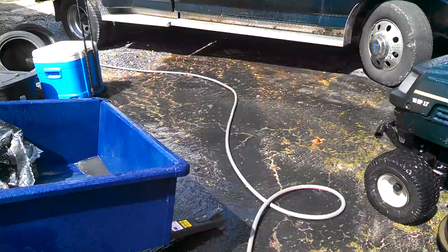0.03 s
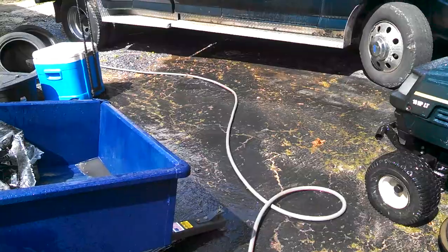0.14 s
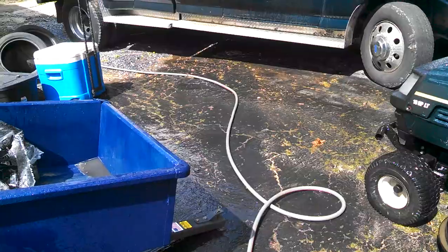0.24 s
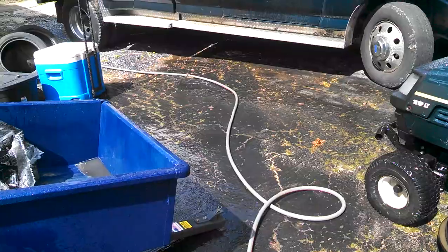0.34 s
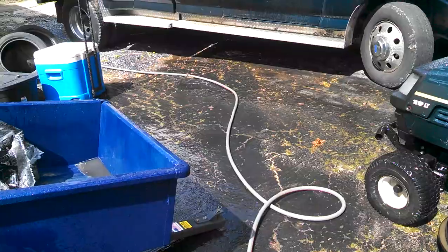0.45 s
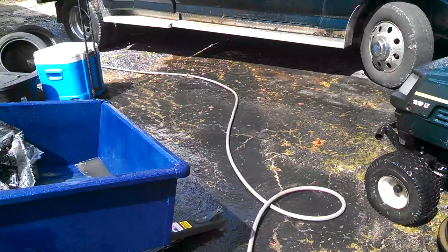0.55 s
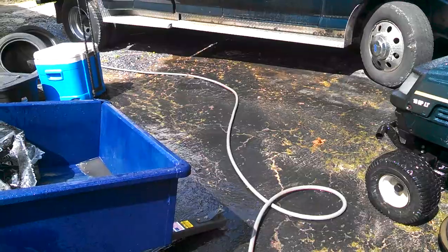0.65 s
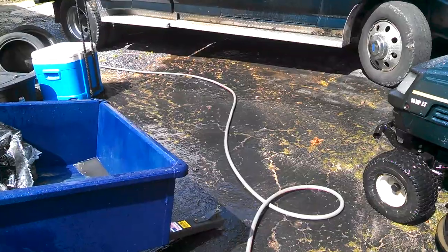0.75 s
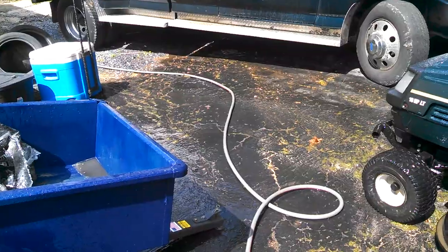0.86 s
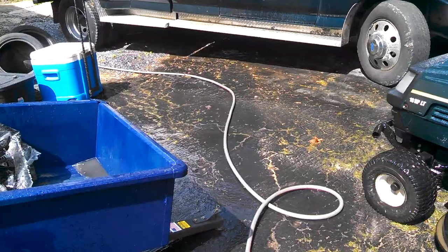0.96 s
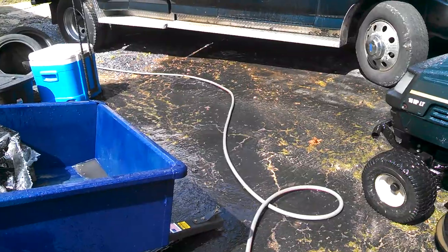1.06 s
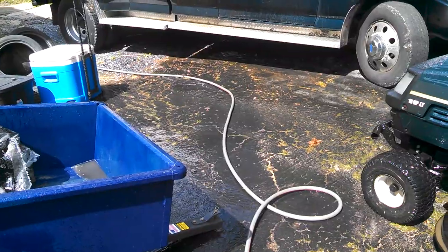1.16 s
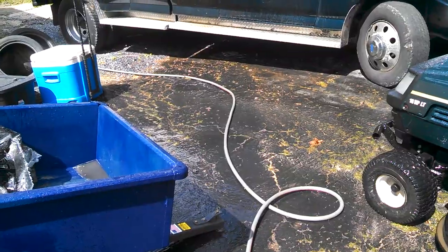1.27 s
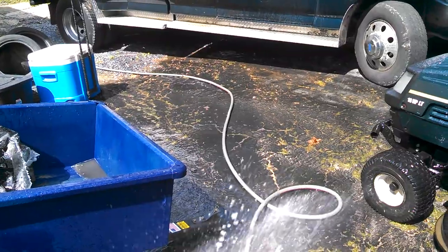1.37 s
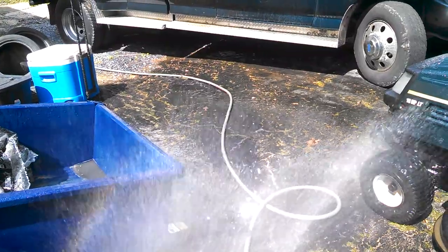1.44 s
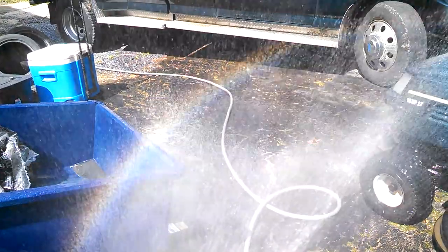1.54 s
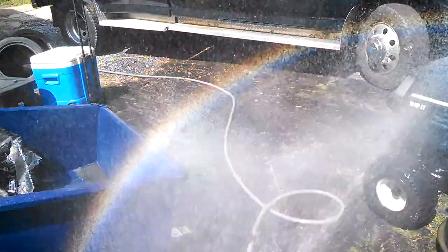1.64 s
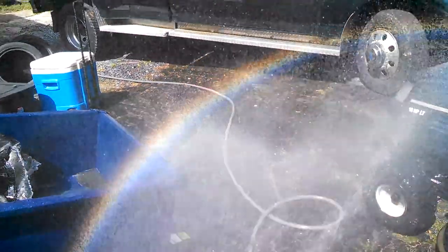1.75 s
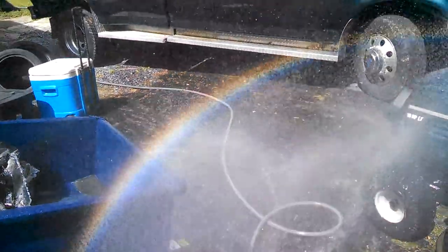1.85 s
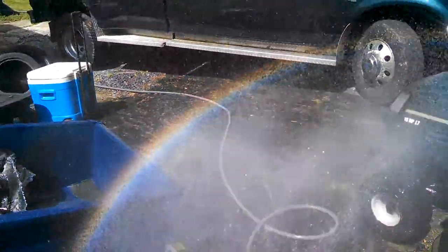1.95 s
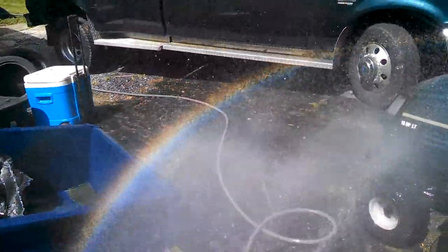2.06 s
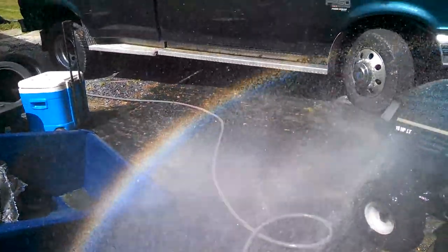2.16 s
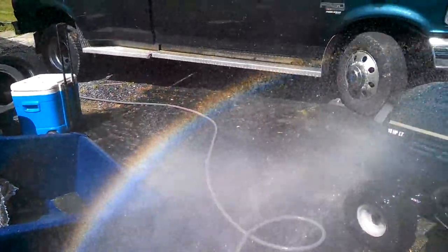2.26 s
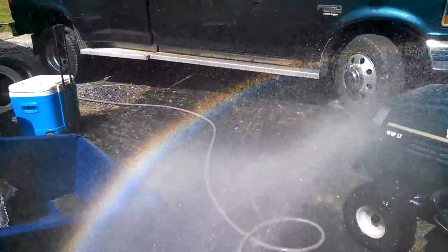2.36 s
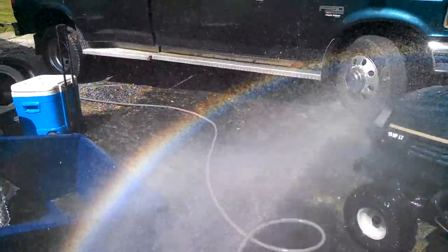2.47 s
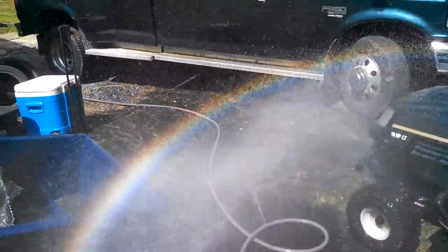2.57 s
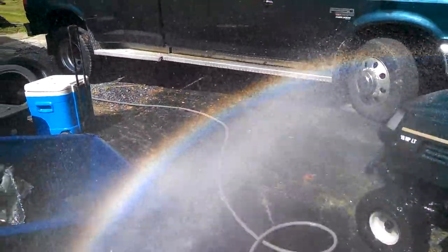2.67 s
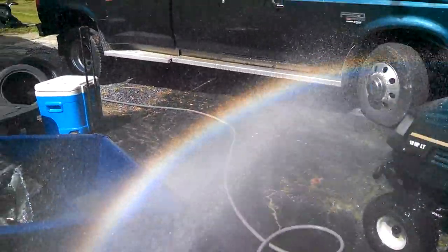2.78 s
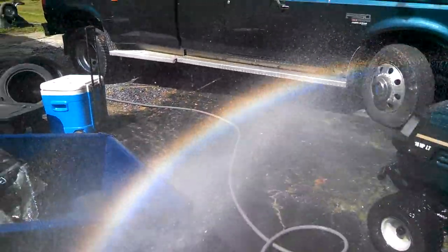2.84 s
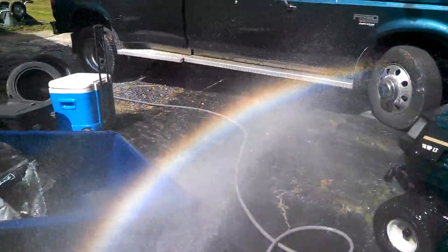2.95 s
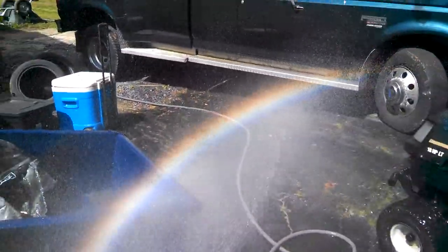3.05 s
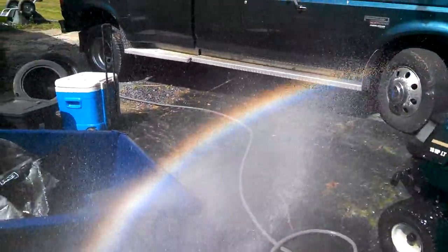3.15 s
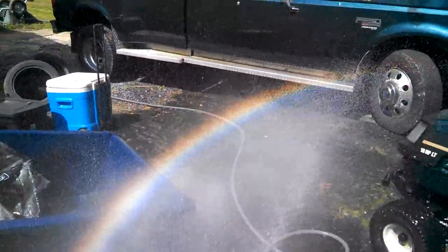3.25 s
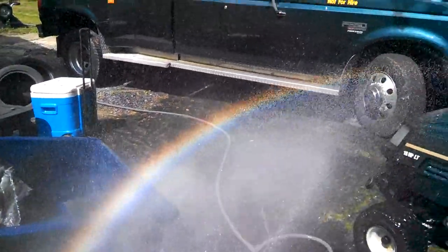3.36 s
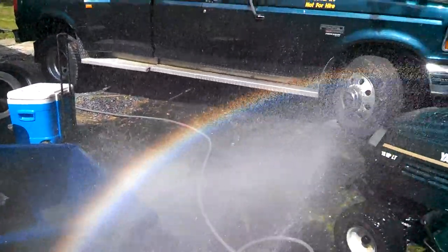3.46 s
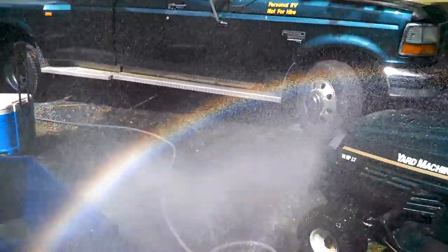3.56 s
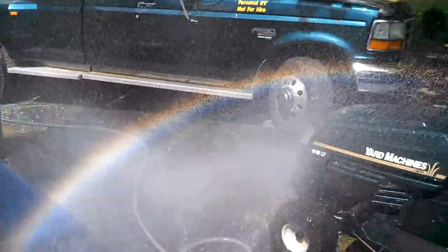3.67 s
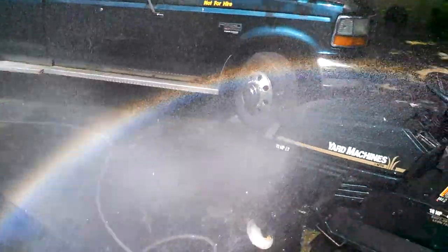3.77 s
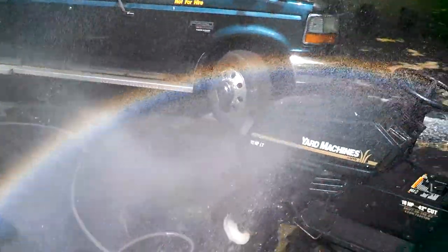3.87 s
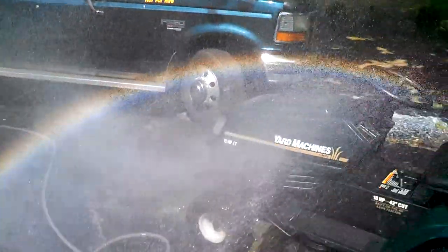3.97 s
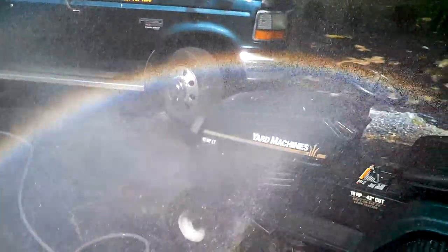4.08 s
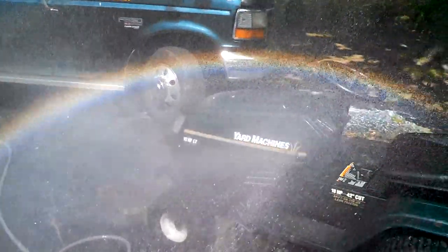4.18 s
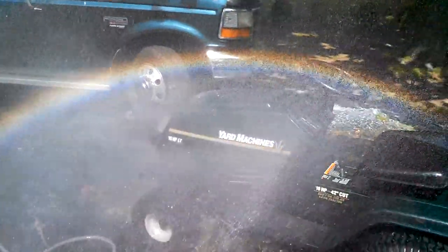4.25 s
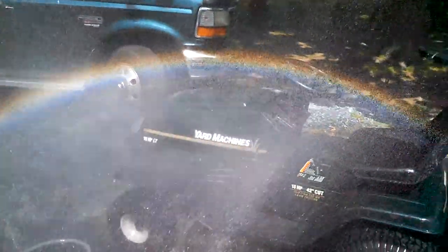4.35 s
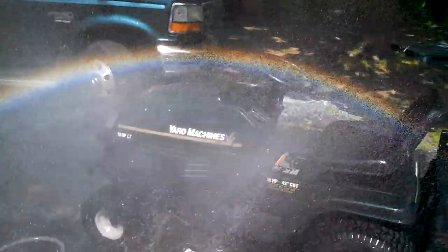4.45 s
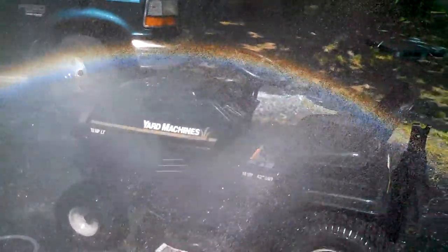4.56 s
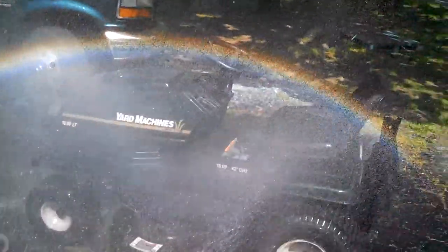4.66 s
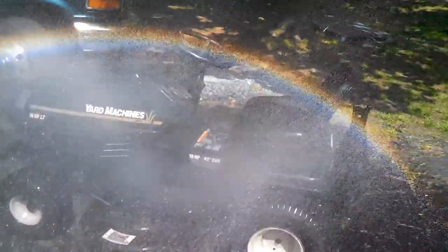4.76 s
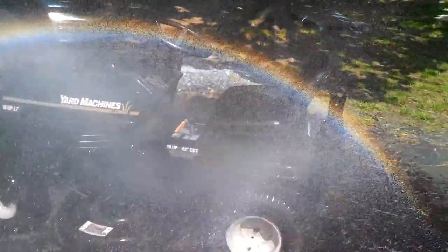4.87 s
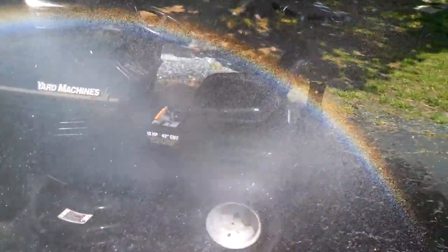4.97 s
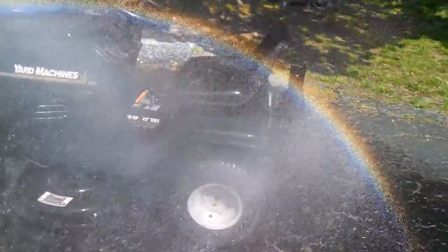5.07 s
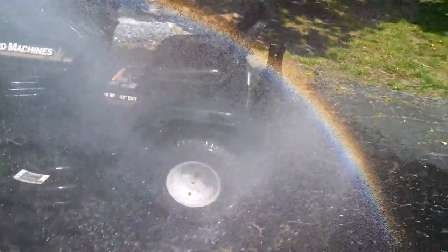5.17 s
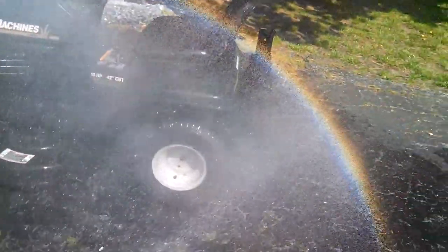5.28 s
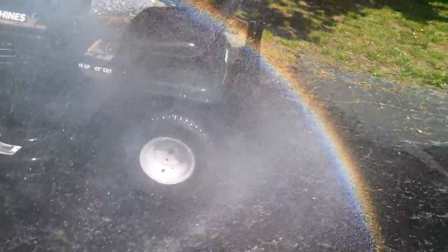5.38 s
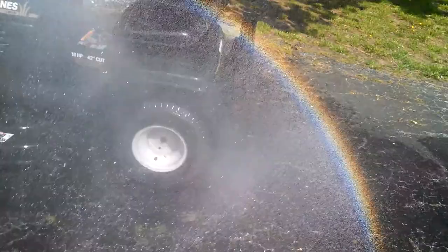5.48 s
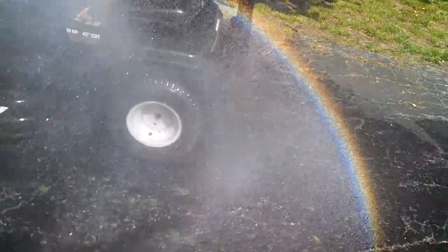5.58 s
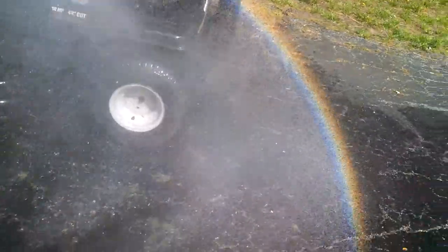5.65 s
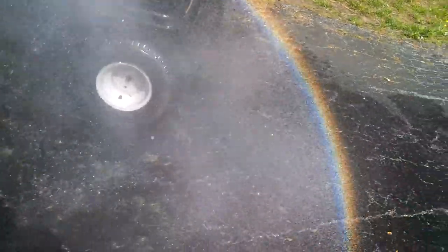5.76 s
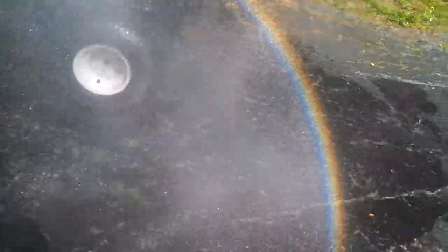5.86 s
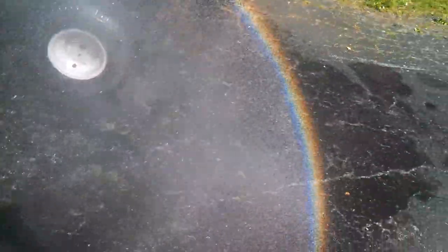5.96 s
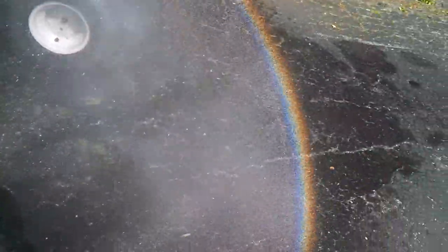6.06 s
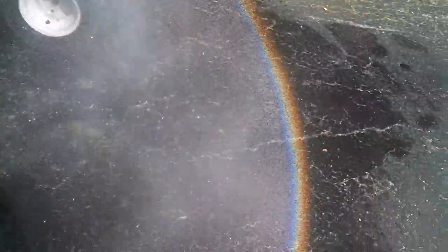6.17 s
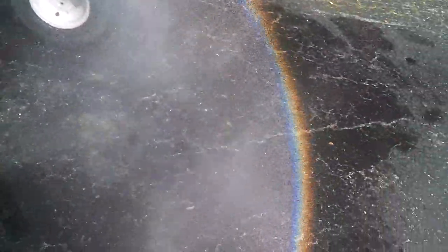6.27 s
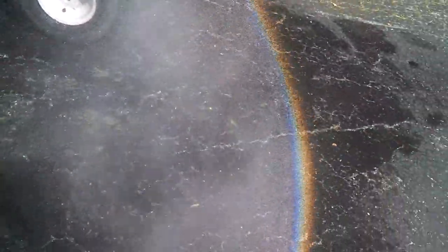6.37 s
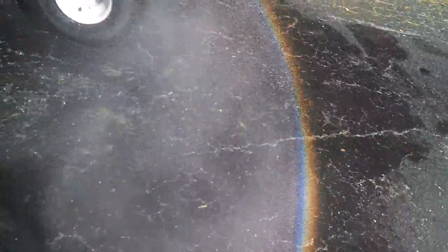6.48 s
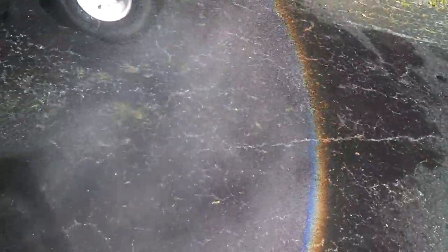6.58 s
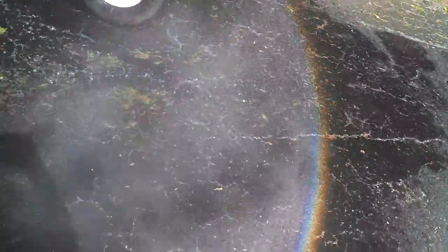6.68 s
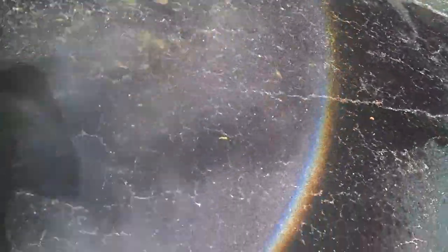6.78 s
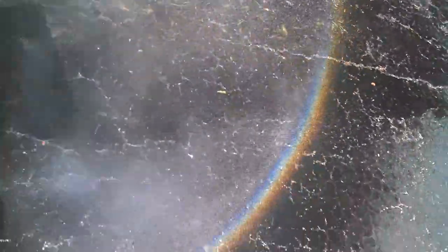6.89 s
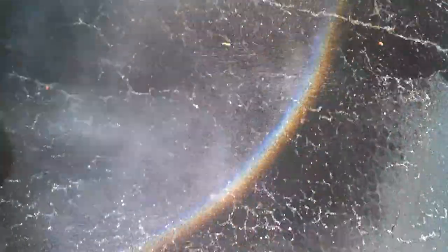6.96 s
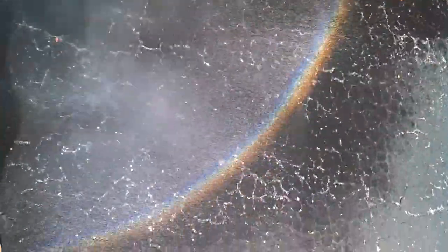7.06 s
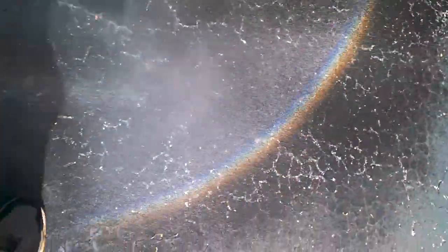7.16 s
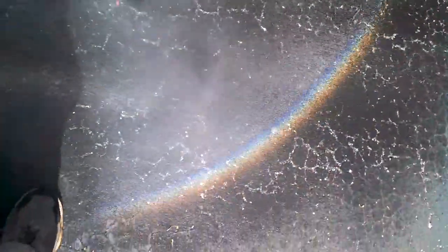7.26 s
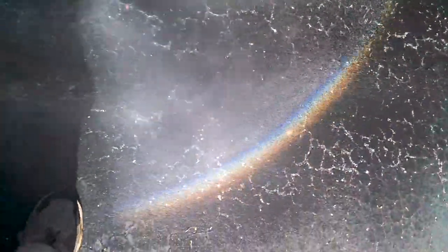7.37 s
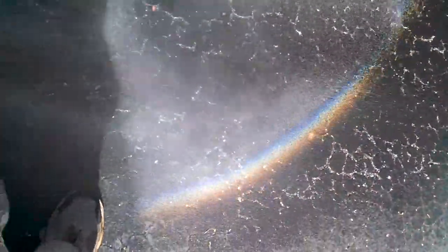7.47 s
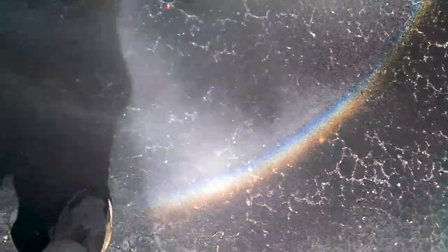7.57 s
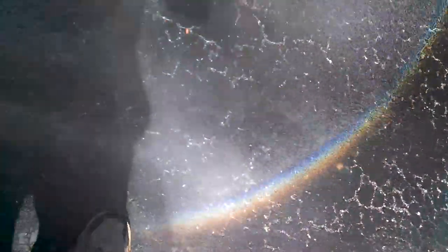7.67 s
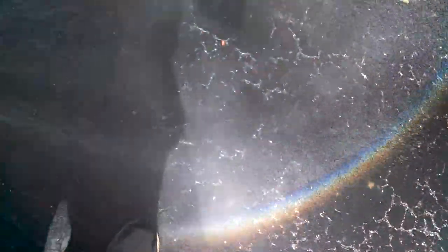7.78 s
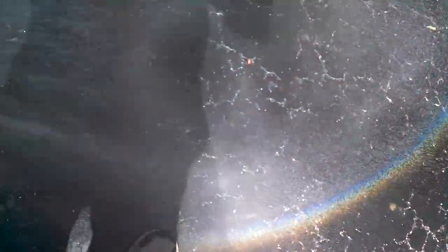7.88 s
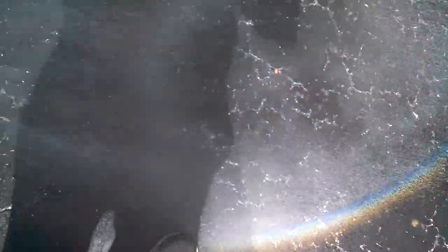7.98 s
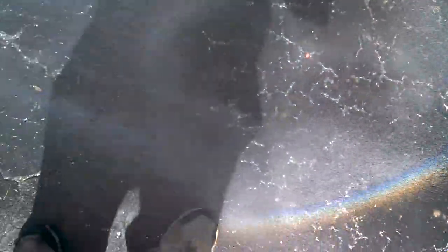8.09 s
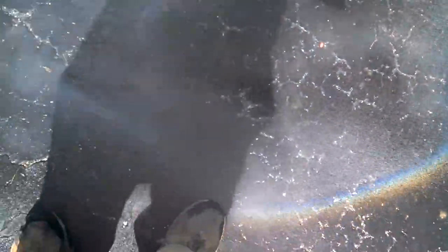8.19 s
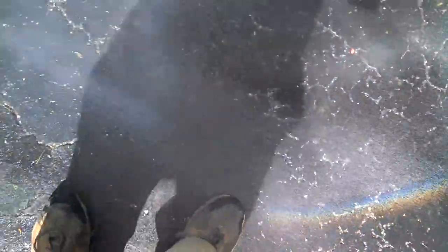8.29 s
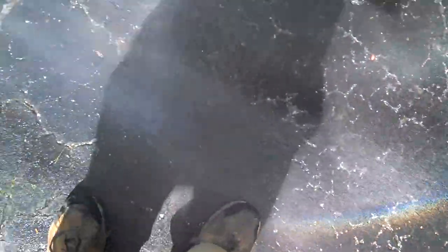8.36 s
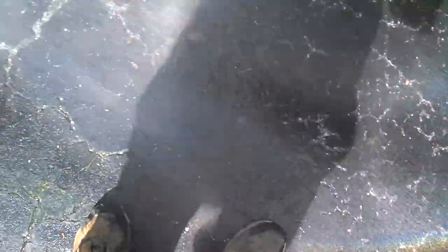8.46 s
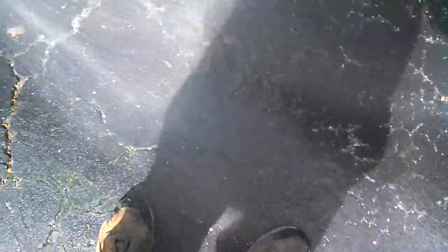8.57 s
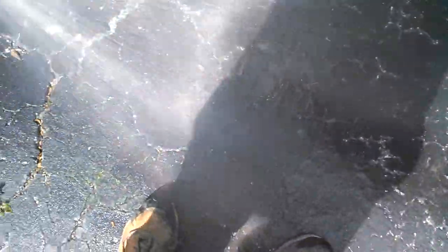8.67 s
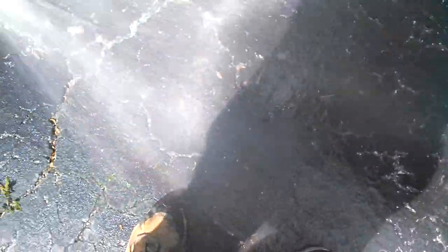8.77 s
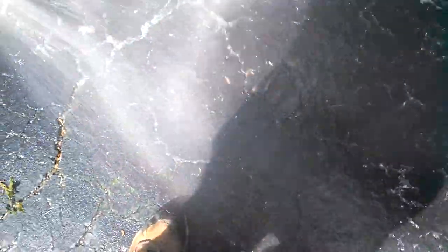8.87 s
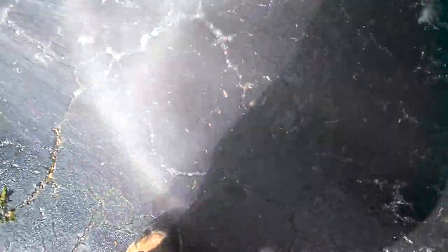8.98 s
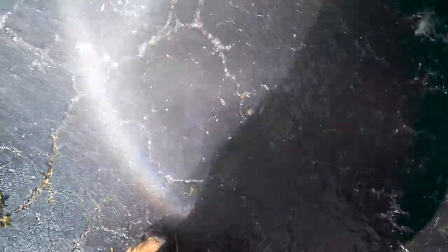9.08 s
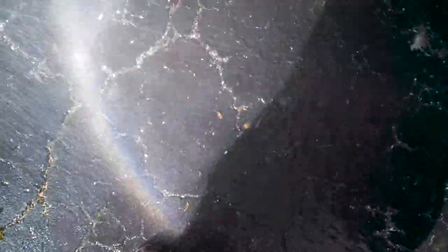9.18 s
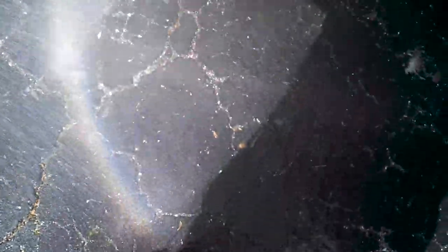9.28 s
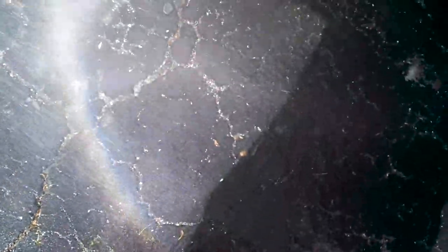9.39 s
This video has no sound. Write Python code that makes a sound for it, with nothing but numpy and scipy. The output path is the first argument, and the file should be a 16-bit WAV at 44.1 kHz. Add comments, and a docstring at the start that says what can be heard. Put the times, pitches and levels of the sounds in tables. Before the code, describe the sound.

The first 0.8 seconds are silent. Then very quiet outdoor air fades in, with a few faint, sliding notes from a far bird at about 0.9-1.2 seconds and a soft hollow rustle near 1.1. At 1.4 a hose nozzle spits in quick bursts and opens into a fine, airy hiss, soft at first and growing steadily until about 3.3. Drops drum dully on a plastic tub, strongest near 3.2 with soft low thumps, then fade quickly as the jet moves off. Pattering on wet pavement becomes fuller, and from 5 to 7.5 liquid plashes build in a puddle. The wide, hollow-sounding hiss slowly changes colour, with short dips, notably around 5, 6.9 and 7.6-9. A thin, very high electronic whine rises slightly as the water starts and stays. Low soft bumps come near 8.3, 8.5 and 9.3; spraying continues to the end, easing slightly.

```python
"""After a moment of silence: quiet yard air, a far bird, a soft rustle and a thin electronic whine.
Then a garden hose opens close to a camera: the nozzle spits, then hisses as a fine mist of shaped noise.
Random drop impacts drum on a plastic tub, patter on a wet driveway and plash in a growing puddle.
A reflection slowly shifts the colour, notches slide as the jet swings, and stereo widening hollows the hiss.
Soft low thumps are scattered through the scene."""
import sys
import numpy as np
from scipy import signal
from scipy.fft import rfft, irfft, next_fast_len
from scipy.io import wavfile
from scipy.ndimage import uniform_filter1d, map_coordinates

SR = 44100
rng = np.random.default_rng(int(sys.argv[2]) if len(sys.argv) > 2 else 0)


def transcribe(u):
    """Save the signal u as a 16-bit wav file named by the first command-line argument.

    u: samples, shape (n,) or (channels, n), limited to [-1, 1]; the rate is SR.
    q: integer samples, one column per channel.
    """
    v = np.clip(np.atleast_2d(u).T, -1, 1)
    q = np.round(v * 32767).astype(np.int16)
    wavfile.write(sys.argv[1], SR, q)


N = 415863

# How the spray goes. Each row: time in seconds, strength in dB before each layer's own level,
# aim from 0 (into the air) to 1 (onto the ground).
SPRAY_PATH = [(1.53, -39, 0.11), (1.9, -37.5, 0.14), (2.4, -32.5, 0), (2.85, -29.5, 0), (3.27, -25.5, 0),
              (3.55, -26, 0.31), (4.15, -24.5, 0.5), (5.3, -23.5, 0.72), (5.85, -25, 1), (7, -24.5, 0.79),
              (7.9, -24, 0.99), (8.6, -24, 0.7), (9.2, -26, 0.24)]
# How two microphones pick up the water. Each row: frequency in Hz, second microphone against first in dB,
# left-minus-right tilt in dB and right's phase lead in radians (both tilts are thinned out in heard()).
WATER_MICS = [(40, -3.5, 3, 0.14), (109, -5.5, -1, -0.65), (222, -3.5, 0.5, -1.02), (420, -4.5, 7, -1.04),
              (590, -3.5, 6, -0.043), (900, -5.5, 2.5, -0.1), (1440, -2.5, 4, 1), (2060, 0, 3, 0.82),
              (2560, -12, -2, 0.95), (5100, -4, -2.5, 0), (14000, -6, -2, 0)]
OPEN_S, BUILD_S = 1.373, 0.14  # the nozzle opens, and how long its pressure takes to build up
LAG_S = 0.000363  # delay of the copy that each side subtracts


def amp(db):
    """Turn decibels into a gain."""
    return np.exp(np.asarray(db) * np.log(10) / 20)


def unit(x):
    """Scale x to an average (rms) level of 1."""
    return x / np.sqrt(np.mean(x ** 2) + 1e-20)


def clock():
    """The time of every sample in seconds."""
    return np.arange(N) / SR


def ramp(start_s, length_s):
    """Rise from 0 to 1 in a straight line."""
    return np.clip((clock() - start_s) / length_s, 0, 1)


def along(rows, hz):
    """Read each column after the frequency, on a log frequency axis."""
    f, *cols = np.transpose(rows)
    return [np.interp(np.log(hz + 1), np.log(f + 1), c) for c in cols]


def curves(rows):
    """Read each column after the time, one value per sample."""
    s, *cols = np.transpose(rows)
    return [np.interp(clock(), s, c) for c in cols]


def wobble(rate):
    """A smooth random curve through this many random points a second."""
    points = rng.standard_normal(int(N * rate / SR) + 4)
    return map_coordinates(points, [clock() * rate])


def filtered(x, response):
    """Multiply the spectrum of x by a response that depends on frequency."""
    size = next_fast_len(N + 8192)
    hz = np.fft.rfftfreq(size, 1 / SR)
    return irfft(rfft(x, size) * response(hz), size)[..., :N]


def patchy(patchy_db):
    """Two white noises that share random louder and softer patches in time and frequency."""
    z = signal.stft(rng.standard_normal((2, N)), nperseg=512)[2]
    field = uniform_filter1d(rng.standard_normal(z.shape[1:]), size=7, axis=0, mode="wrap")
    field = uniform_filter1d(field, size=12, axis=1)
    noise = signal.istft(z * amp(patchy_db * unit(field)), nperseg=512)[1]
    return unit(noise[:, :N])


def drops(rate, scatter_db):
    """Two showers of single-sample impacts, about rate a second each, of differing sizes."""
    lands = rng.random((2, N)) < rate / SR
    size = amp(scatter_db * np.clip(rng.standard_normal((2, N)), -2, 2))
    return unit(lands * size * rng.choice([-1, 1], (2, N)))


def heard(pair, spectrum, mics):
    """Colour two microphones' signals; each side subtracts a late, recirculating copy of the other. Rms 1."""
    cross_hz = 350  # below this the second microphone is less and less fed across
    matched_hz = (2000, 2550)  # between these the sides come into step
    lopsided_hz = (950, 1250)  # between these the steady low imbalance fades out
    feedback = 0.13  # share of the late copy that goes round again: flat tops between the notches
    notch_edge = 0.22  # steepens the notches' walls

    size = next_fast_len(N + 8192)
    hz = np.fft.rfftfreq(size, 1 / SR)
    second_db, balance_db, lead = along(mics, hz)
    turn = np.arctan(amp(second_db))
    colour = amp(along(spectrum, hz)[0])
    strong, weak = rfft(pair, size) * colour * [np.cos(turn), np.sin(turn)]

    late = np.exp(-2j * np.pi * hz * LAG_S)
    across = 1 - np.exp(-np.square(hz / cross_hz))
    uneven = np.interp(hz, matched_hz, [1, 0])
    # Above the low range, no imbalance is left at the notches.
    tilt = np.maximum(np.interp(hz, lopsided_hz, [1, 0]), np.abs(late.imag))
    lean = amp(tilt * balance_db / 2) * np.exp(-1j * tilt * uneven * lead / 2)
    left = (strong - across * late * weak) * lean
    right = (weak - late * strong) / lean

    def walls(comb):
        return 1 - (1 - uneven) * np.exp(-np.square(np.abs(comb) / (2 * notch_edge)))

    loop = feedback * (1 - uneven) * late
    mid = (left + right) * walls(1 - across * late) / (1 - loop)
    side = (left - right) * walls(1 + across * late) / (1 + loop)
    return unit(irfft([mid + side, mid - side], size)[:, :N])


def spits():
    """The nozzle spits as it clears and sputters now and then: brief level changes in dB."""
    # Each row: centre in seconds, half length in seconds, added level in dB.
    spurts = [(1.379, .003, 4.5), (1.398, .006, 7.5), (1.408, .003, -2.5), (1.415, .003, 3.5),
              (1.427, .005, 3.5), (1.445, 0.014, 8), (3.7, 0.051, 1), (5.2, 0.028, 1), (6.397, 0.021, 0),
              (6.85, .03, 0.5), (7.223, .02, 0.5)]
    return sum(db * np.exp(-np.square((clock() - s) / width)) for s, width, db in spurts)


def spray():
    """The jet breaks into hissing mist; larger drops patter on the wet ground over a low wash."""
    # The colour of each layer. Each row: frequency in Hz, relative level in dB per Hz.
    wash_colour = [(20, -19), (35, -13), (50, -4), (78, -7), (94, 3.5), (108, -4.5), (160, -3.8),
                   (240, -.2), (350, 2), (600, -3), (900, -1), (1350, -3.5), (2200, -18), (5000, -57)]
    patter_colour = [(500, -50), (1300, -10), (1650, -5), (2050, -1), (2600, -1.5), (3100, -.5), (4000, 0),
                     (5200, -1), (7000, -12), (12000, -40)]
    mist_colour = [(1500, -80), (3500, -8), (5200, -0.5), (6500, 0.5), (9000, 0.5), (12000, -2),
                   (14000, -2.5), (15500, -7)]

    strength_db, ground = curves(SPRAY_PATH)
    slack = 1 - ramp(OPEN_S, BUILD_S)
    # Each layer: level with the jet in the air, change on the ground, change before pressure has built up.
    # At first there is mist, but little has landed.
    wash_db = -11.5 + 1.5 * ground - 19.5 * slack
    patter_db = -7 + 2.5 * ground - 45 * slack + spits()
    mist_db = 0.2 - 2.5 * ground - 19 * slack + spits()
    flutter_db = 0.45 * wobble(28)  # the sheet of water breaks up unevenly

    wash_noise = patchy(patchy_db=1.16) + amp(-9.5) * drops(rate=500, scatter_db=5.5)
    wash = heard(wash_noise, wash_colour, WATER_MICS)
    patter_noise = patchy(patchy_db=1.1) + amp(-10.0) * drops(rate=2500, scatter_db=1.5)
    patter = heard(patter_noise, patter_colour, WATER_MICS)
    mist_noise = patchy(patchy_db=1.02) + amp(-10.5) * drops(rate=11000, scatter_db=3.5)
    mist = heard(mist_noise, mist_colour, WATER_MICS)

    patter_wobble_db = 0.25 * wobble(14)
    water = amp(wash_db) * wash + amp(patter_db + patter_wobble_db) * patter + amp(mist_db) * mist
    return water * amp(strength_db + flutter_db) * ramp(OPEN_S, length_s=0.009)


def tub():
    """Drops drum on a plastic tub, as hard as the spray, and fade once the jet has moved off it."""
    # The tub's dull body. Each row: frequency in Hz, relative level in dB per Hz.
    body = [(25, -10), (50, -10), (110, -1), (190, -4), (260, -2), (380, -1.5), (520, -1.5), (800, -28),
            (2000, -46)]
    level_db = -13  # against the spray's strength
    left_s, fade_db_per_s = 3.28, 24
    hit_s, hit_half_length_s, hit_db = 3.21, 0.09, 3.5  # the jet sweeps squarely across the tub

    thuds = patchy(patchy_db=0.5) + amp(-10) * drops(rate=700, scatter_db=6.5)
    away_db = fade_db_per_s * np.maximum(clock() - left_s, 0)
    landing = ramp(OPEN_S + BUILD_S / 2, length_s=0.29)  # until the full spray reaches it
    square_db = hit_db * np.exp(-np.square((clock() - hit_s) / hit_half_length_s))
    loudness = amp(curves(SPRAY_PATH)[0] + level_db + square_db - away_db)
    return landing * loudness * heard(thuds, body, WATER_MICS)


def puddle():
    """Drops plash into water gathering on the asphalt, growing louder as it fills."""
    # The plashes' colour. Each row: frequency in Hz, relative level in dB per Hz.
    colour = [(450, -24), (640, -2.5), (770, 1), (950, -4), (1300, -2), (1650, -21), (2100, -4.5),
              (2550, -1), (3100, -30)]
    plashes = patchy(patchy_db=1.5) + amp(-4.5) * drops(rate=370, scatter_db=4)
    filling = ramp(start_s=4.93, length_s=2.6)
    loudness = amp(curves(SPRAY_PATH)[0] - 11)
    return filling * loudness * heard(plashes, colour, WATER_MICS)


def bounced(x):
    """A nearby surface returns a slightly later copy that combs the middle of the image as the aim moves."""
    # The reflection's delay. Each row: time in seconds, delay in milliseconds.
    delays = [(2, .35), (3.2, .35), (5.3, .378), (6.5, .41), (7.4, .45), (8.8, .42)]
    # The surface's answer. Each row: frequency in Hz, level in dB before the moving gain below.
    surface = [(400, -20), (1250, -10), (3000, -27), (7000, -53)]
    # Strongest as the jet swings down. Each row: time in seconds, gain in dB on top of that answer.
    gains = [(2, -12), (4.5, -0.5), (5.7, 5), (6.55, 8.5), (7.4, 6.5), (9, 2)]
    delay_ms, = curves(delays)
    copy = filtered(x.mean(axis=0), lambda hz: amp(along(surface, hz)[0]))
    copy = copy * amp(curves(gains)[0])
    late = np.arange(N) - delay_ms * SR / 1000  # in samples
    return x + map_coordinates(copy, [late])


def shaded(x):
    """Peaks and notches of the hiss slide together as the jet swings; lowering it changes their depths."""
    # The colour's peaks and notches. Each row: centre in Hz and width in Hz (both before sliding),
    # level in dB with the jet raised, level in dB with it lowered.
    bands = [(2670, 350, 2.5, -1), (2900, 190, -1, -1), (3700, 250, 1.5, 1), (4520, 360, 0, -1.5),
             (6930, 280, 0.5, -2), (7180, 410, 1, 0.5), (8230, 180, -1, -2), (9510, 460, 2.5, -2.5),
             (10900, 320, -5.5, 0), (13450, 400, -5, -1.5), (14500, 600, -1, 3)]
    # How the bands slide with the swing. Each row: time in seconds, factor on their frequencies.
    swing = [(2, 1.42), (2.5, 1.27), (3.3, 1.24), (4.2, 1.155), (4.9, 1.1), (5.7, 1.03), (6.4, 1),
             (7.5, 1.02), (8.3, 1.055), (9.2, 1.2)]
    down_s, down_length_s = 5.4, 0.76  # the jet is lowered

    hz, t, z = signal.stft(x, SR, nperseg=512)
    unstretched_hz = hz[:, None] / np.interp(t, *np.transpose(swing))
    down = np.clip((t - down_s) / down_length_s, 0, 1)
    db = 0
    for centre, width, air, ground in bands:
        depth_db = air + (ground - air) * down
        db = db + depth_db * np.exp(-np.square((unstretched_hz - centre) / width))
    return signal.istft(z * amp(db), SR, nperseg=512)[1][:, :N]


def hollowed(x):
    """Bands of the sum and difference of the sides are thinned or lifted, and move over time."""
    # Each row of all three: time in seconds, centre in Hz, half width in Hz, level in dB.
    # A hollow band near 2.8 kHz in the middle of the image shifts a little.
    mid_notch = [(1.6, 2770, 220, -26), (3.3, 2730, 195, -24), (4.2, 2740, 130, -18), (5, 2720, 90, -12),
                 (5.5, 2840, 160, -24), (6.2, 2900, 200, -26), (6.6, 2990, 290, -28), (7.2, 2900, 180, -26),
                 (8.4, 2850, 151, -22), (8.78, 2920, 230, -24), (9.3, 2880, 160, -22)]
    # A notch in the difference of the sides sinks as the jet swings down.
    side_notch = [(1.6, 3900, 300, -5), (3.2, 3600, 380, -2), (4.2, 3180, 400, -2), (5.2, 2870, 400, -3),
                  (6.5, 2230, 280, -5), (7.3, 2200, 300, -5), (8.5, 2340, 300, -2)]
    # A wide-sounding boost in the low treble.
    side_peak = [(1.6, 2100, 400, 3), (3.6, 1950, 450, 4.5), (5.2, 1900, 300, 1), (6.5, 1750, 200, 1),
                 (9, 1740, 200, 6)]

    sum_and_difference = np.array([x[0] + x[1], x[0] - x[1]]) / 2
    hz, t, (mid, side) = signal.stft(sum_and_difference, SR, nperseg=1024)

    def band(rows):
        s, *cols = np.transpose(rows)
        centre, width, db = [np.interp(t, s, c) for c in cols]
        offset = (hz[:, None] - centre) / width
        return amp(db * np.exp(-np.square(np.square(offset))))

    shaped = np.array([mid * band(mid_notch), side * band(side_notch) * band(side_peak)])
    mid, side = signal.istft(shaped, SR, nperseg=1024)[1][:, :N]
    return np.array([mid + side, mid - side])


def dips():
    """The water's level falls abruptly, holds for a moment and comes back."""
    # Each row: start in seconds, length in seconds, depth in dB.
    drops_in_level = [(3.12, 0.046, 1.5), (3.84, 0.063, 1.5), (5.016, 0.11, 2.5), (5.245, .17, 2),
                      (5.493, 0.13, 1.1), (6.538, 0.065, 2), (6.891, 0.16, 3.2), (7.262, 0.1, 2),
                      (7.646, 0.15, 2.5), (8.67, 0.13, 2), (8.898, 0.2, 1.5)]
    t, sunk_db = clock(), np.zeros(N)
    for s, length, db in drops_in_level:
        near = (t > s) & (t < s + 2 * length)
        sunk_db[near] += db * np.exp(-np.square(np.square((t[near] - s) / length)))
    return amp(-sunk_db)


def thumps():
    """Soft, low bumps of unsteady pitch swell and die, in opposite phase on the two sides."""
    # Each row: centre in seconds, pitch in Hz around which it wavers, level in dB.
    bump_list = [(3.2, 121.4, -52), (3.22, 195, -49), (8.3, 52, -53), (8.55, 48, -48), (9.33, 68, -50)]
    half_length_s = 0.06
    bumps, waver = np.zeros(N), 1 + 0.08 * wobble(40)
    for s, hz, db in bump_list:
        near = np.abs(clock() - s) < 3 * half_length_s
        swell = np.exp(-np.square((clock()[near] - s) / half_length_s))
        phase = 2 * np.pi * np.cumsum(hz * waver[near]) / SR
        bumps[near] += amp(db) * swell * unit(np.sin(phase))
    return np.array([bumps, -bumps])


def yard():
    """Quiet outdoor air as steady coloured noise, with one soft, hollow rustle before the water."""
    # Colours of air and rustle. Each row: frequency in Hz, relative level in dB per Hz.
    air_colour = [(25, -11), (60, 5), (120, 5.5), (165, -1.5), (250, -.5), (320, -2.5), (460, 2),
                  (600, -8.5), (1200, -15), (2800, -17), (4200, -22.5), (6000, -28), (10000, -22),
                  (15000, -22)]
    rustle_colour = [(60, -26), (180, -11), (300, -4), (470, -1), (560, -13), (1200, -34)]
    # How the microphones pick up the yard: the same columns as WATER_MICS.
    yard_mics = [(60, -3, 3, -0.21), (130, 3, -2, -0.97), (300, -5, -8, -1.2), (480, -16, -8, -0.91),
                 (1200, -11, -1, 0.025), (2500, -5, -2, 0)]
    start_s, attack_s, hold_s, release_s = 1.08, 0.038, 0.13, 0.08

    air = amp(-59.5) * heard(patchy(patchy_db=1.0), air_colour, yard_mics)
    stir = ramp(start_s, attack_s) - ramp(start_s + attack_s + hold_s, release_s)
    rustle = heard(patchy(patchy_db=5), rustle_colour, yard_mics)
    return air + amp(-57.5) * stir * rustle


def bird():
    """A far bird's wavering notes slide in pitch; the right side gets a late, inverted copy."""
    # Each row: centre in seconds, pitch in Hz before the slide and waver, slide in Hz per second, level in dB.
    notes = [(.93, 2400, 500, -76), (1.03, 2830, 4500, -72), (1.115, 2150, -1800, -76),
             (1.2, 3280, -2500, -75.5)]
    half_length_s = 0.03
    song, waver = np.zeros(N), 1 + 0.012 * wobble(150)
    for s, hz, slide, db in notes:
        near = np.abs(clock() - s) < 3 * half_length_s
        t = clock()[near] - s
        phase = 2 * np.pi * np.cumsum((hz + slide * t) * waver[near]) / SR
        song[near] += amp(db) * np.exp(-np.square(t / half_length_s)) * unit(np.sin(phase))
    return np.array([song, -np.roll(song, round(LAG_S * SR))])


def whine():
    """A thin, unsteady tone of the camera's electronics swells and drifts up as the water starts."""
    swell_s = (1.5, 3.2)  # the two moments between which pitch and level move
    pitch_hz = np.interp(clock(), swell_s, (14760, 14793)) + 11 * wobble(60)
    level_db = np.interp(clock(), swell_s, (-66, -54.5))
    return amp(level_db) * unit(np.sin(2 * np.pi * np.cumsum(pitch_hz) / SR))


def scene():
    """Mix the water, thumps and yard sounds, left and right."""
    water = spray() + tub() + puddle()
    water = hollowed(shaded(bounced(water))) * dips()
    return water + thumps() + yard() + bird() + whine()


def record(dry):
    """The camera starts after a moment with a very short fade-in, and the highest treble is cut."""
    start_s, fade_s, top_hz = 0.823, 0.007, 15500
    live = dry * ramp(start_s, fade_s) ** 2
    return filtered(live, lambda hz: np.clip((top_hz - hz) / 100, 0, 1))


dry = scene()
out = record(dry)
transcribe(out)
```